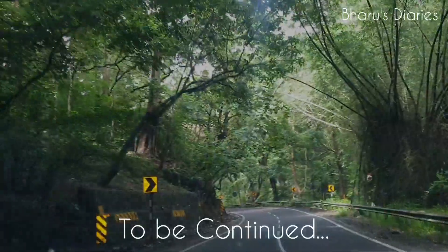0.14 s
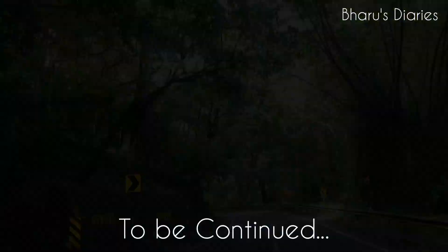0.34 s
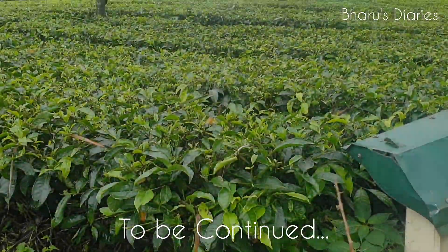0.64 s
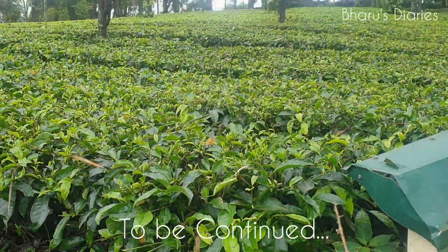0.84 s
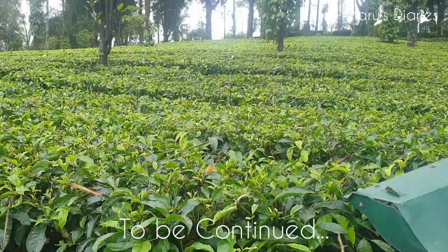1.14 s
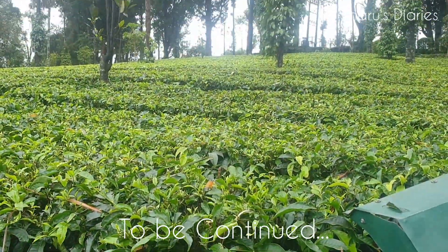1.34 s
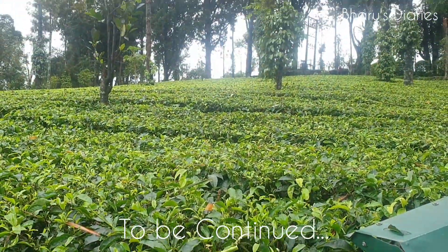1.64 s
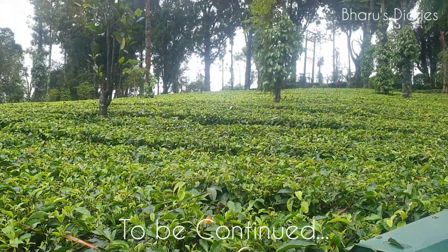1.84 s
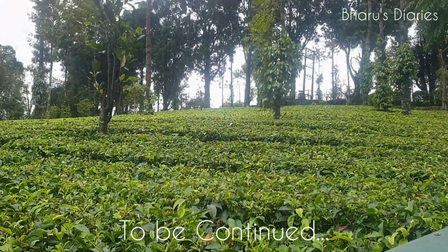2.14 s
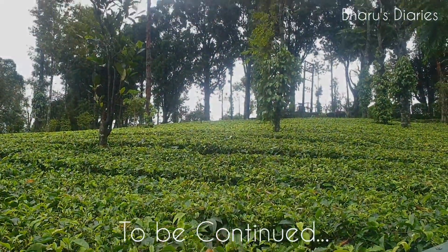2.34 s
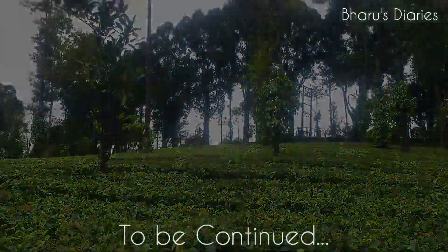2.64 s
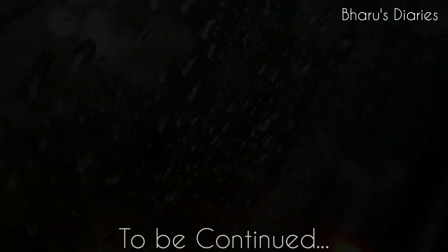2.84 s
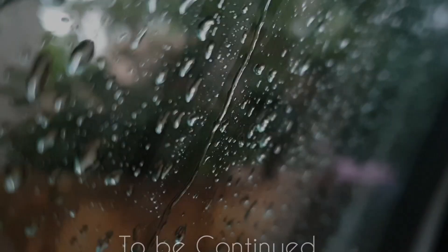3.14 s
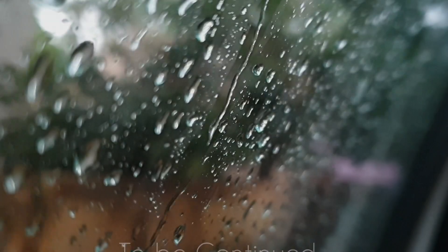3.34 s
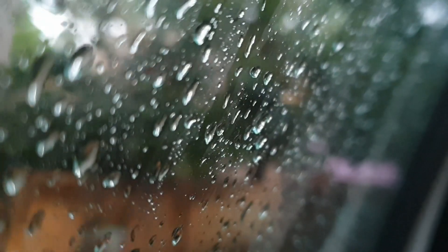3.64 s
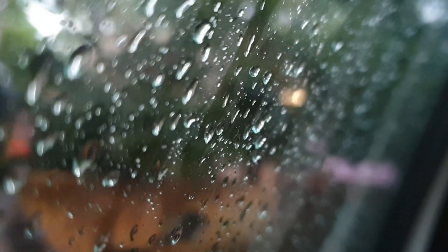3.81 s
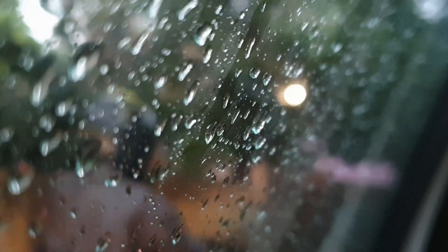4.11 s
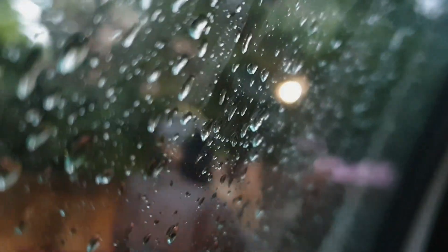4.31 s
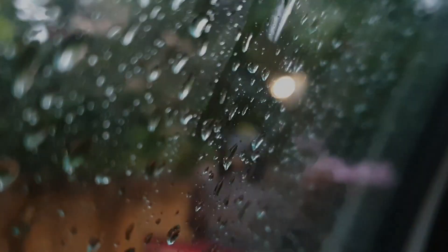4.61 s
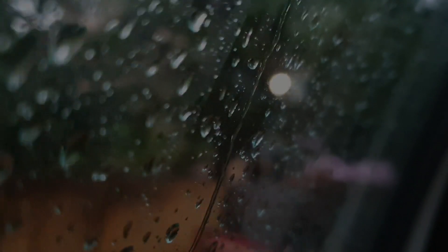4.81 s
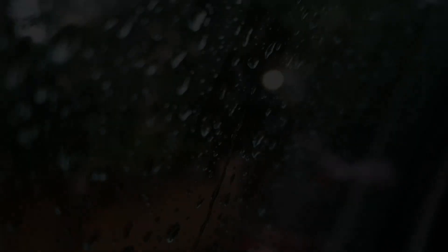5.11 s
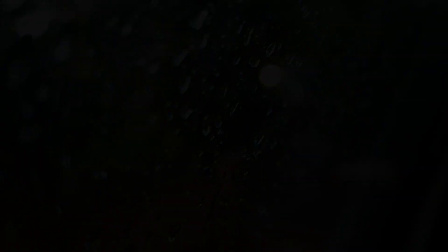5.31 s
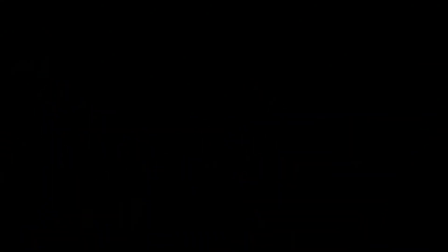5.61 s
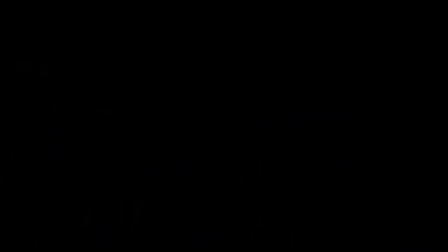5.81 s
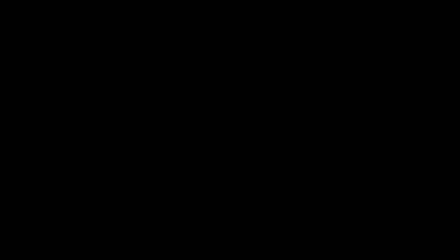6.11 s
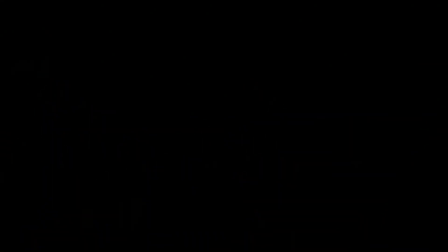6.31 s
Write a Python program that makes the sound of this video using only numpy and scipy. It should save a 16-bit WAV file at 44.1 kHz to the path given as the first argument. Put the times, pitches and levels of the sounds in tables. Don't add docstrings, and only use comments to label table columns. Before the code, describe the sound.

Inside a moving car, a low boom with a jolt and faint tyre hiss fades within half a second. Outdoors, wind thuds softly on the microphone while two birds whistle in quick turns, echoing off trees. At about two seconds it cuts to rain, which swells into a steady wash with close, sharp drops on the window and dull taps on metal, then slowly fades.

```python
import sys
import numpy as np
from scipy import signal
from scipy.fft import rfft, irfft
from scipy.io import wavfile
from scipy.ndimage import uniform_filter1d, minimum_filter1d

SR = 44100
rng = np.random.default_rng(int(sys.argv[2]) if len(sys.argv) > 2 else 0)


def elevation(decibels):
    levels = np.asarray(decibels, float)
    return 10 ** (levels / 20)


def to_wav(sig):
    pcm = np.clip(np.atleast_2d(sig), -1, 1) * 32767
    pcm = np.round(pcm).astype(np.int16)
    wavfile.write(sys.argv[1], SR, pcm.T)


N = 284531
CAR_END, HILL_END = 30000, 100000


# pitch_hz, level_db (per Hz)
WASH_SPECTRUM = [(18, -76), (30, -53), (64, -54), (95, -30), (117, -1.5), (208, -1.5), (244, -3), (371, -1),
                 (549, 0), (1140, -4.5), (1270, -3), (2640, -14.5), (5220, -20), (10900, -35),
                 (15700, -43.5)]
# pitch_hz, likeness (0 to 1)
RAIN_LIKENESS = [(60, 0.12), (290, 1), (640, 1), (1400, 0.5), (3100, 0.73), (7000, 0.54), (15000, .4)]
# pitch_hz, lead_rad
RAIN_LEAD = [(260, 0.33), (780, 0.62), (2150, 0.6), (3400, 1.26), (8000, 1.94), (12000, -1.5)]


def rain_wash():
    return noise(WASH_SPECTRUM, RAIN_LIKENESS, RAIN_LEAD, 0.63, 2.8, 3220, size=1024)


def splash(hz, wide, t60, shared, rise_s=0.00035, count=1600):
    t, f = np.arange(count) / SR, np.fft.rfftfreq(count, 1 / SR)
    band = np.exp(-.5 * (np.log((f + 1) / hz) / wide) ** 2)
    spray = evened(irfft(rfft(rng.standard_normal((2, count))) * band, count))
    tick = elevation(-60 * t / (0.19 * t60))
    tail = elevation(-9.0 - 60 * t / t60)
    return (spray + shared * spray[::-1]) * (tick + tail) * (1 - np.exp(-t / rise_s))


def drop(hz, treble_db):
    one = splash(hz, 0.27, 0.056, 0.13)
    one = one + elevation(-5.5) * splash(4500, 0.44, 0.077, 0.26)
    one = one + elevation(treble_db + 11.5) * splash(12000, 0.36, .04, -.2)
    spatter = splash(3600, 0.4, .07, .25, rise_s=.003)
    late = round(rng.uniform(.004, .014) * SR)
    one = one + elevation(-2.5) * np.roll(spatter, late, axis=1)
    pan_db = 2.5 * rng.standard_normal()
    return one * elevation(pan_db * np.array([[.5], [-.5]]))


# start_s, peak_db, splash_hz, treble_db (added to the peak)
LARGE_DROPS = [(2.3904, -42, 4640, -24.5), (2.4377, -42, 3300, -22), (2.5285, -40, 4400, -22),
               (2.5415, -38, 4120, -23), (2.6676, -39.5, 4900, -17.5), (2.9356, -33, 3900, -19),
               (2.9965, -35, 4050, -19), (3.0771, -32, 3400, -21), (3.1484, -32.5, 3640, -18.5),
               (3.208, -32.5, 4440, -24.5), (3.2659, -34.5, 3790, -22), (3.369, -36.5, 4700, -20),
               (3.3858, -32, 4260, -26), (3.4293, -34.5, 4750, -18), (3.5572, -36, 4180, -26),
               (3.5796, -33.5, 3470, -26), (3.64, -37.5, 4110, -16.5), (3.6797, -32, 5500, -24),
               (3.714, -30.5, 4340, -22.5), (3.7649, -31, 3880, -24), (3.825, -36, 3810, -24.5),
               (3.869, -31.5, 4420, -21.5), (3.9109, -37, 4350, -18), (3.9114, -29.5, 3320, -23),
               (3.9726, -28.5, 5100, -25), (4.0132, -34.5, 4500, -24), (4.0444, -36, 3340, -22),
               (4.106, -32.5, 3430, -18.5), (4.1489, -37.5, 3640, -19), (4.2845, -37.5, 4090, -21),
               (4.3639, -36, 4230, -15), (4.3766, -33, 3800, -21), (4.4876, -35.5, 3420, -17),
               (4.6782, -31.5, 3460, -20), (4.724, -39.5, 4490, -17.5), (4.739, -33.5, 3560, -23.5),
               (4.8567, -38, 3400, -19), (4.8837, -33, 5140, -23), (4.9061, -34.5, 6230, -25),
               (4.9306, -34.5, 3700, -20), (4.9855, -31.5, 3800, -20), (5.0977, -37, 5080, -19),
               (5.1232, -32.5, 5400, -23.5), (5.1753, -29, 4600, -20.5), (5.3152, -28, 3520, -25),
               (5.385, -39.5, 3620, -20.5), (5.4406, -36, 3850, -21), (5.6789, -40.5, 5730, -18),
               (5.7313, -30.5, 4570, -18.5), (5.8762, -38.5, 4430, -17),
               (3.8764, -36, 4640, -20), (3.9004, -28, 3020, -25), (4.1154, -33.5, 3070, -20),
               (4.1804, -34, 2540, -22), (4.5894, -36, 2990, -23), (5.3264, -31, 3060, -24),
               (5.4403, -34, 3850, -23), (5.5253, -36.5, 2880, -22), (5.7897, -39, 2620, -22),
               (6.0636, -41, 4380, -21), (6.1893, -41.5, 3840, -21)]


def large_drops():
    out = np.zeros((2, N))
    for start_s, peak_db, hz, treble_db in LARGE_DROPS:
        add(out, start_s, elevation(peak_db - 5.5) * drop(hz, treble_db))
    return out


def dent(width_s):
    u = np.arange(-4, 9, 1 / (SR * width_s))
    push = 0.5 * np.exp(-.125 * (u - 3) ** 2) - np.exp(-.5 * u ** 2)
    return np.array([push, 0.16 * push])


# start_s, peak_db
PANEL_THUDS = [(3.033, -26), (3.073, -28), (3.123, -25), (3.295, -31), (3.464, -25), (3.644, -36),
               (3.685, -34), (3.91, -28), (3.94, -34), (4.007, -24), (4.125, -22), (4.595, -28),
               (4.652, -24), (4.984, -28), (5.062, -30), (5.119, -30), (5.319, -24), (5.668, -26.5),
               (5.798, -29), (5.965, -31)]


def panel_thuds():
    out = np.zeros((2, N))
    for start_s, peak_db in PANEL_THUDS:
        add(out, start_s + 0.0019, elevation(peak_db - 1.5) * dent(0.00029))
    return out


def patter(per_s, spread_db, kinds):
    lands = rng.random(N) < per_s / SR
    size = elevation(spread_db * np.minimum(rng.exponential(1, N), 4)) * lands
    kind = rng.integers(0, len(kinds), N)
    layers = [signal.oaconvolve((size * (kind == k))[None], one)[:, :N] for k, one in enumerate(kinds)]
    return evened(sum(layers))


def small_drops():
    fine = [splash(hz, 0.35, 0.016, 0.1) for hz in np.geomspace(3000, 8000, num=14)]
    dull = [dent(width_s) for width_s in np.geomspace(.00015, .0006, num=5)]
    pitches, trebles = np.geomspace(3000, 6500, num=8), np.linspace(-26, -18, num=8)
    middling = [drop(hz, treble_db) for hz, treble_db in zip(pitches, trebles)]
    out = elevation(-20.0) * patter(190, 2.7, fine)
    out += elevation(-14.5) * patter(160, 2.5, dull)
    return out + elevation(-32) * patter(11, 2.5, middling)


# start_s, full_s, leave_s, end_s, bend (exponent)
RAIN_FADE = (2.172, 2.63, 5.02, 8.16, 1.95)


def rain():
    out = (rain_wash() + small_drops()) * elevation(-35) * fade(*RAIN_FADE)
    out = out + large_drops() + panel_thuds()
    low_cut = signal.butter(4, 80, "high", fs=SR, output="sos")
    return signal.sosfilt(low_cut, out) * elevation([[.8], [-.8]])


OVERTONES_DB = [-70, -77, -90]
# time_s, left_over_right_db
HEAD_TURN = [
    (.8, 2),
    (1.3, 1),
    (1.42, -6),
    (1.54, 4),
    (1.8, 2.5),
    (1.9, 10),
    (2.06, 8.5),
]


def whistle(start, length, from_hz, to_hz, effort_db, rich_db):
    attack_s, release_s = .0075, 0.016
    t = np.arange(0, length, 1 / SR)
    drift = signal.oaconvolve(rng.standard_normal((2, SR // 2)), np.hanning(600)[None], "same")
    waver, flutter = evened(drift)[:, :len(t)]
    hz = to_hz + (from_hz - to_hz) * (1 - t / length) ** 1.4
    turn = 2 * np.pi * np.cumsum(hz * (1 + .006 * waver)) / SR
    tone = elevation(effort_db - 2.5 * t / length + 1.8 * flutter) * np.sin(turn)
    overtone_db = rich_db + .2 * effort_db + 3.6 * waver + 3 * np.log2(hz / 3100)
    tone += sum(elevation(db + overtone_db) * np.sin(k * turn) for k, db in enumerate(OVERTONES_DB, 2))
    edges = np.clip(np.minimum(t / attack_s, (length - t) / release_s), 0, 1)
    tone *= np.sqrt(2) * np.sin(np.pi / 2 * edges)
    balance_db = np.interp(start + t, *np.transpose(HEAD_TURN))
    out = np.zeros((2, N))
    add(out, start, tone * elevation(balance_db * np.array([[.5], [-.5]])))
    return out


# delay_s, level_db
TRUNK_ECHOES = [
    (.03, -7.5),
    (.055, -22),
    (.09, -18),
    (0.128, -28),
]


def woods(x, t60, wet_db):
    taps = np.zeros((2, SR))
    at = np.arange(200, SR - 20, 20) + rng.integers(0, 20, (2, (SR - 201) // 20))
    np.put_along_axis(taps, at, rng.choice([-1., 1.], at.shape), 1)
    t = np.arange(SR) / SR
    grove_db = 4 * np.exp(-.5 * ((t - 0.11) / 0.017) ** 2)
    taps *= elevation(-60 * t / t60 + grove_db)
    taps *= elevation(wet_db) / np.linalg.norm(taps[0])
    for delay_s, level_db in TRUNK_ECHOES:
        taps[:, round(delay_s * SR)] += elevation(level_db)
    taps[:, 0] = 1
    return signal.fftconvolve(x, taps, axes=1)[:, :N]


# start_s, length_s, from_hz, to_hz, effort_db
PLAIN_NOTES = [(.822, 0.081, 1936, 2047, -46.5), (.908, .118, 2052, 2131, -44),
               (1.041, 0.042, 2107, 2160, -43), (1.127, 0.035, 3170, 2110, -43),
               (1.153, .022, 2070, 1850, -38.5), (1.168, .028, 1856, 1597, -48.5),
               (1.226, 0.048, 1682, 1784, -50.5), (1.29, .08, 1776, 1856, -57),
               (1.372, 0.031, 2750, 3110, -46.5), (1.392, 0.029, 3130, 3104, -43.5),
               (1.398, 0.055, 2207, 2283, -40.5), (1.43, .035, 2347, 2425, -49),
               (1.46, 0.1, 2290, 2357, -47.5), (1.82, 0.29, 516, 520, -70.5)]
# start_s, length_s, from_hz, to_hz, effort_db
REEDY_NOTES = [
    (1.455, .04, 3620, 3460, -71),
    (1.49, 0.032, 3460, 3280, -48.5),
    (1.509, .087, 3265, 3100, -40.5),
    (1.6, 0.051, 3170, 3226, -47.5),
    (1.765, 0.04, 2317, 2400, -53.5),
    (1.795, 0.086, 2403, 3084, -41.5),
    (1.881, .048, 3116, 3165, -33),
    (1.94, 0.047, 3216, 3190, -45),
    (1.988, .07, 3150, 3096, -32.5),
    (2.058, .03, 3080, 2720, -48.5),
]


def birdsong():
    song = sum(whistle(*note, rich_db=-4) for note in PLAIN_NOTES)
    song = song + sum(whistle(*note, rich_db=0) for note in REEDY_NOTES)
    return elevation(-.5) * woods(song, 0.65, -1.8)


def microphone_bend(bird):
    high_pass = signal.butter(4, 4000, "high", fs=SR, output="sos")
    return signal.sosfilt(high_pass, 0.34 * bird ** 2)


# pitch_hz, level_db (per Hz)
WIND_SPECTRUM = [(7.1, -23.5), (12, 11), (28, -2.5), (98, -13), (115, -7.5), (136, -38), (203, -25.5),
                 (229, -54), (255, -48), (300, -33), (390, -69.5), (660, -120)]
# time_s, lift_db
WIND_LIFT = [
    (.57, 0.5),
    (.67, 3.5),
    (.83, 5.5),
    (1.02, -0.5),
    (1.22, -0.5),
    (1.38, 3),
    (1.64, 5),
    (1.76, 5),
    (2.02, -7),
]


def wind():
    t = np.arange(N) / SR
    buffet = noise(WIND_SPECTRUM, [(30, 1.0), (120, 0.25)], [(0, 0.0072)], 1.72, 0.74, 6.9,
                   size=4096, count=HILL_END)
    lift_db = sum(db * np.exp(-((t - s) / 0.055) ** 2) for s, db in WIND_LIFT)
    return elevation(-38.5) * buffet * elevation(lift_db)


# pitch_hz, level_db (per Hz)
LEAF_SPECTRUM = [(1800, -33), (2600, -3), (4500, -3), (5200, -17), (10500, -21), (11000, -60)]
# start_s, full_s, leave_s, end_s, bend (exponent)
RUSTLE_SWELL = (.84, .93, 1.05, 1.15, 2.1)


def leaves():
    rustle = noise(LEAF_SPECTRUM, [(100, 0.37)], [(0, 0)], 2.8, .6, 900, size=1024, count=HILL_END)
    return elevation(-70.5) * fade(*RUSTLE_SWELL) * rustle


# pitch_hz, level_db (per Hz)
HUSH_SPECTRUM = [(71, -41), (120, -14), (130, -12.5), (206, -12), (340, -25.5), (396, -19.5), (529, -24),
                 (808, -33), (1040, -33.5), (1470, -35), (1620, -37), (4000, -42.5), (12000, -69),
                 (15600, -67.5), (22000, -120)]


def hush():
    return elevation(-58.5) * noise(HUSH_SPECTRUM, [(100, 0.31), (9000, 0.13)], [(0, 0.0049)], 1.7, .6, 900,
                              size=1024, count=HILL_END)


# pitch_hz, level_db (per Hz)
MOTOR_SPECTRUM = [(150, -55), (192, -22.5), (203, 8.5), (214, -24.5), (270, -59.5)]


def motor_drone():
    return elevation(-68) * noise(MOTOR_SPECTRUM, [(100, 0.58)], [(0, 0.0073)], 1.5, 1.5, 9,
                            size=8192, count=HILL_END)


def masked(x, depth_db, top_hz):
    hz, _, z = signal.stft(x[:, :HILL_END], SR, nperseg=1024)
    power_db = 10 * np.log10(uniform_filter1d(abs(z) ** 2, size=5, axis=1) + 1e-20)
    loudest_db = -minimum_filter1d(-power_db.max(0), size=41, axis=0)
    keep = np.clip((power_db - loudest_db + depth_db) / 6, .08, 1) ** (hz > 1300)[:, None]
    thin = np.where(hz < top_hz, 1, .25)[:, None]
    out = signal.istft(z * keep * thin, SR, nperseg=1024)[1][:, :HILL_END]
    return np.pad(out, ((0, 0), (0, N - HILL_END)))


# start_s, full_s, leave_s, end_s, bend (exponent)
HILL_FADE = (0.081, 0.39, 1.975, 2.182, 1.76)


def hillside():
    bird = birdsong()
    far = masked(bird + microphone_bend(bird) + hush() + leaves() + motor_drone(), 46.6, 12000)
    far = np.array([np.roll(far[0], 50), far[1]])
    cut = np.clip((2.172 - np.arange(N) / SR) / .006, 0, 1)
    return (far + wind()) * fade(*HILL_FADE) * cut


# pitch_hz, level_db (per Hz)
BOOM_SPECTRUM = [(12, -32.5), (20, -7.5), (32, 2.5), (49, 2.5), (81, -1), (108, 0), (135, -3.5),
                 (168, -13.5), (232, -20), (329, -30.5), (500, -32.5), (650, -70), (1100, -120)]
# pitch_hz, level_db (per Hz)
TYRE_SPECTRUM = [(180, -24), (300, 0.5), (411, -20), (461, -8.5), (600, -18), (794, -17.5), (1560, -35),
                 (1780, -31), (2400, -39), (2740, -43), (3570, -39.5), (5300, -55), (15500, -66.5)]
# pitch_hz, likeness (0 to 1)
CAR_LIKENESS = [(60, 1), (240, 0.73), (950, 0.18), (3770, 0.85), (15000, 0.78)]
# pitch_hz, level_db, t60_s
JOLT_MODES = [
    (45.5, -23, 0.093),
    (75.5, -20.1, 0.097),
    (145.5, -28, 0.37),
]
# start_s, full_s, leave_s, end_s, bend (exponent)
CAR_FADE = (-0.13, -0.11, .2, 0.44, 1.97)


def car():
    t = np.arange(N) / SR
    jolt = sum(elevation(db - 60 * t / t60) * np.cos(2 * np.pi * hz * t) for hz, db, t60 in JOLT_MODES)
    boom = noise(BOOM_SPECTRUM, CAR_LIKENESS, [(0, 0.0077)], 3.0, 0.45, 50, size=4096, count=CAR_END)
    boom = boom * elevation(-23) * (1 - np.exp(-t / 0.0097))
    hiss = noise(TYRE_SPECTRUM, CAR_LIKENESS, [(0, 0.013)], 0.87, 2.7, 900, size=1024, count=CAR_END)
    hiss = hiss * elevation(-47.5)
    gain = fade(*CAR_FADE)
    return ((jolt + boom) * gain + hiss * gain ** 0.62) * elevation([[.6], [-.6]])


def noise(spectrum, same, turn, patchy_db, flicker_db, flicker_hz, size, count=N):
    hop, hz = size // 4, np.fft.rfftfreq(size, 1 / SR)
    a, b, c, d, patches = rng.standard_normal((count // hop + 5, len(hz), 5)).T
    wide = evened(uniform_filter1d(uniform_filter1d(patches, size=70, axis=0), size=3, axis=1))
    patches = evened(uniform_filter1d(uniform_filter1d(patches, size=6, axis=0), size=6, axis=1))
    flicker = evened(uniform_filter1d(rng.standard_normal(a.shape[1]), size=3)) + 0.42 * wide
    share = (hz ** 2 / (hz ** 2 + flicker_hz ** 2))[:, None]
    alike = np.clip(read(same, hz), -1, 1)[:, None]
    left = a + 1j * b
    right = alike * left * np.exp(-1j * read(turn, hz))[:, None] + np.sqrt(1 - alike ** 2) * (c + 1j * d)
    level_db = read(spectrum, hz)[:, None] + patchy_db * patches + flicker_db * share * flicker
    z = np.array([left, right]) * elevation(level_db)
    x = signal.istft(z, nperseg=size, noverlap=size - hop)[1]
    x = evened(x[:, size // 2:count + size // 2])
    return np.pad(x, ((0, 0), (0, N - count)))


def evened(x):
    return x / np.sqrt(np.mean(x ** 2) + 1e-20)


def read(points, hz):
    f, value = np.transpose(points)
    return np.interp(np.log(hz + 1), np.log(f + 1), value)


def fade(start, full, leave, end, bend):
    t = np.arange(N) / SR
    return np.clip(np.minimum((t - start) / (full - start), (end - t) / (end - leave)), 0, 1) ** bend


def add(mix, s, sound):
    part = mix[:, round(s * SR):][:, :sound.shape[1]]
    part += sound[:, :part.shape[1]]


def scene():
    return rain() + hillside() + car()


def roll_off(x):
    return signal.sosfilt(signal.butter(12, 15820, fs=SR, output="sos"), x)


def record(dry):
    return roll_off(dry)


dry = scene()
out = record(dry)
to_wav(out)
```